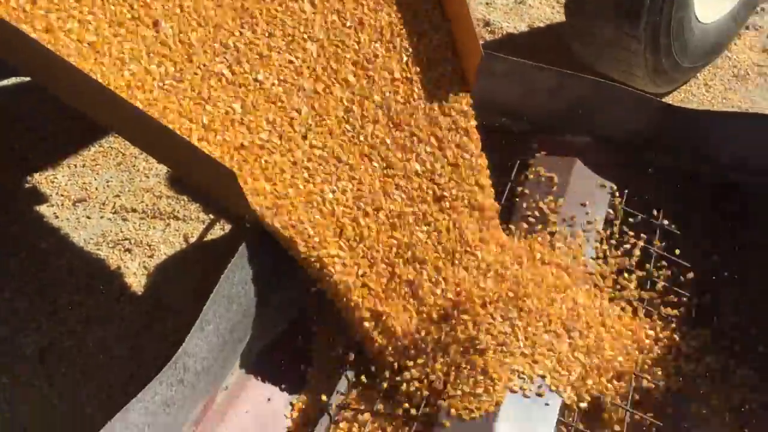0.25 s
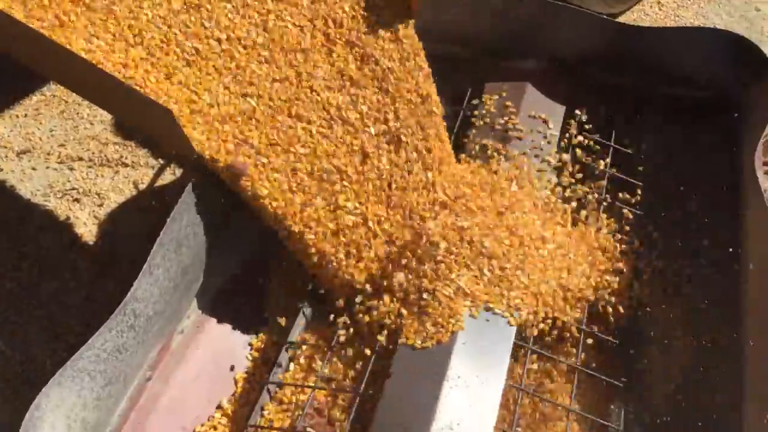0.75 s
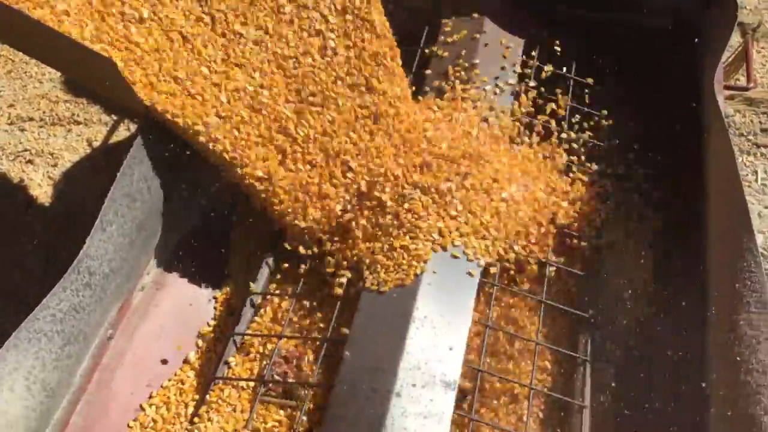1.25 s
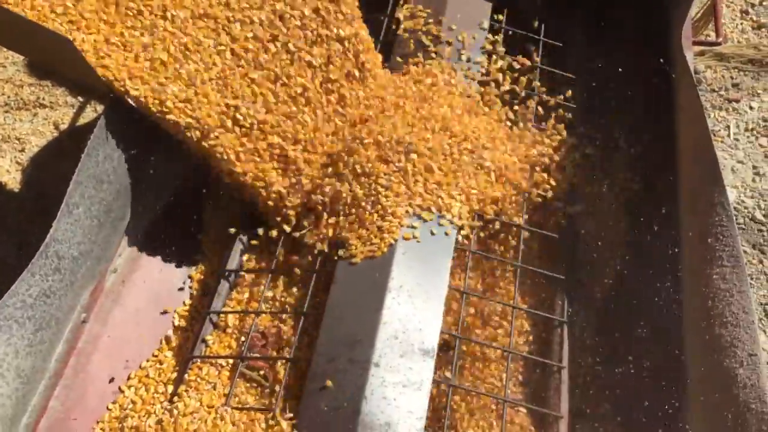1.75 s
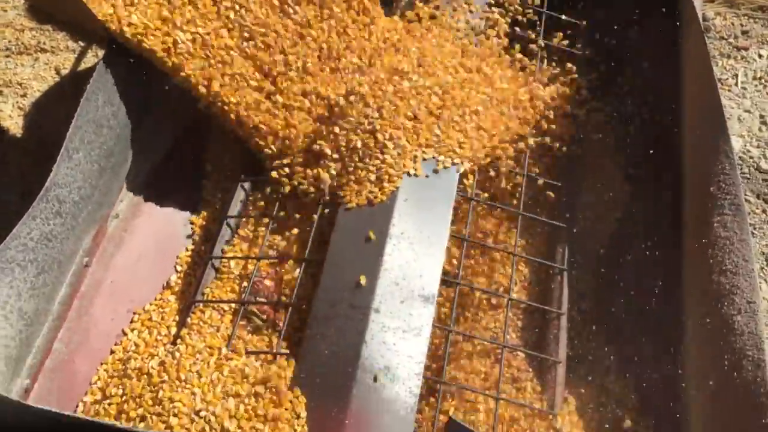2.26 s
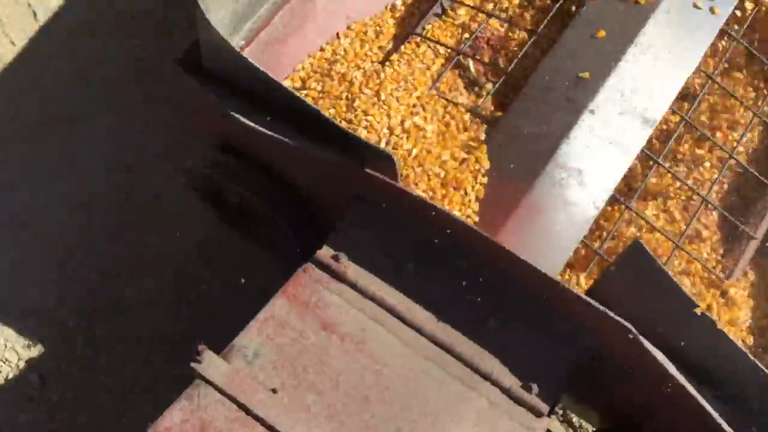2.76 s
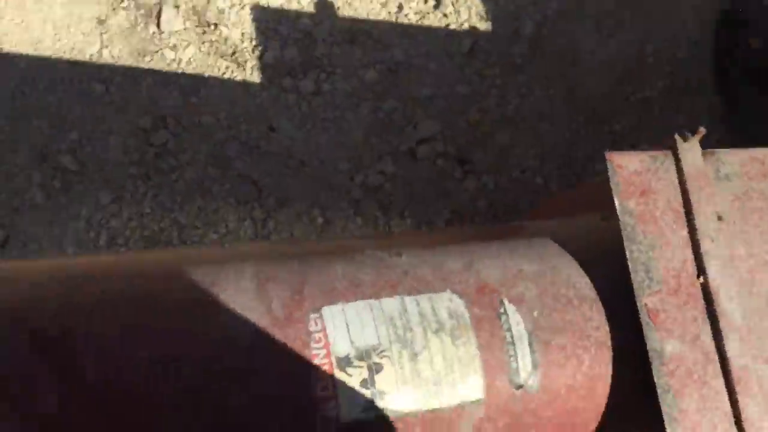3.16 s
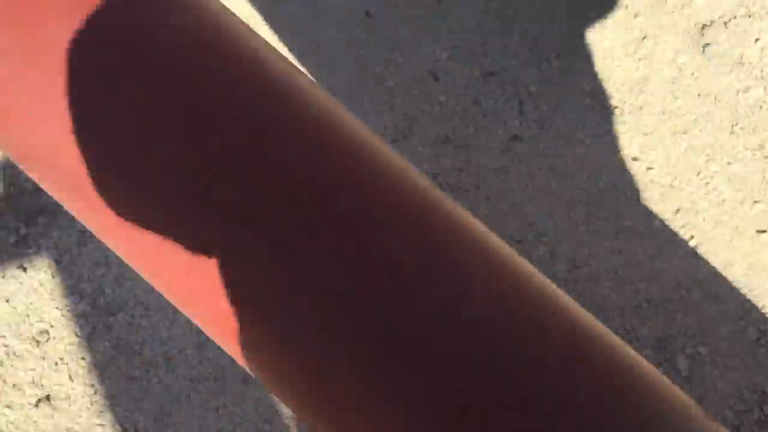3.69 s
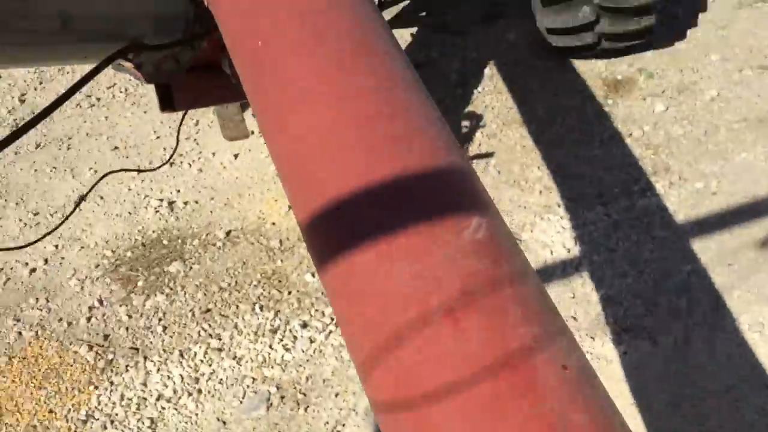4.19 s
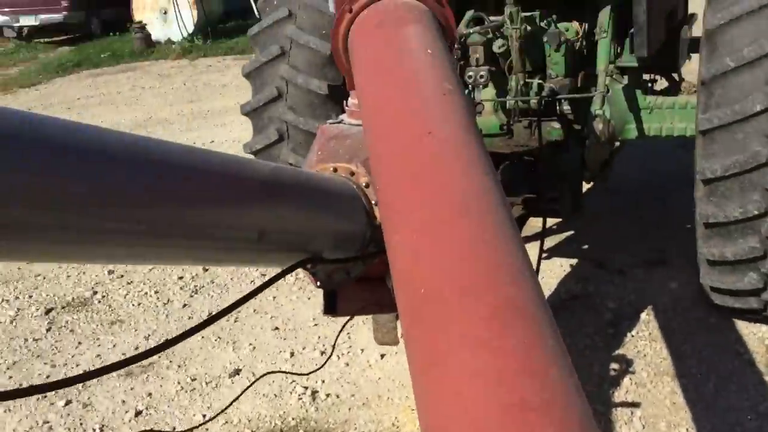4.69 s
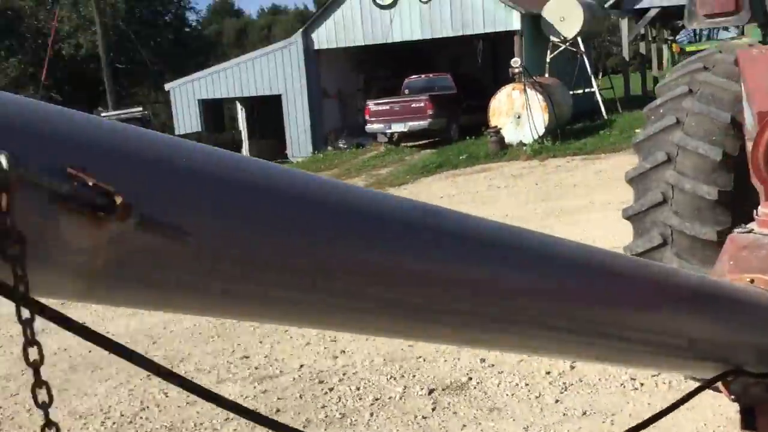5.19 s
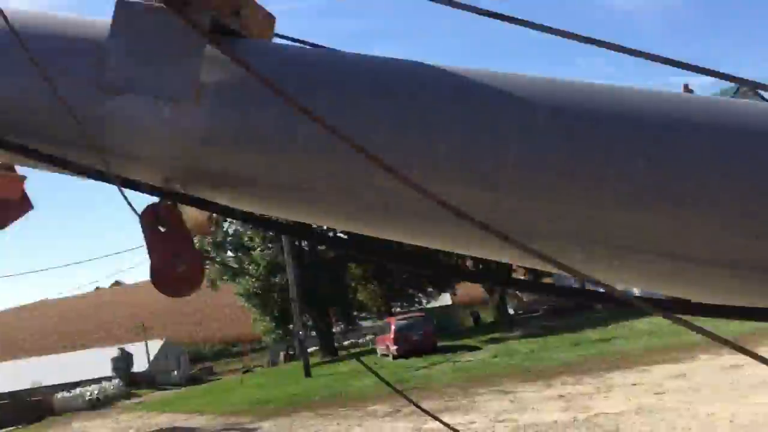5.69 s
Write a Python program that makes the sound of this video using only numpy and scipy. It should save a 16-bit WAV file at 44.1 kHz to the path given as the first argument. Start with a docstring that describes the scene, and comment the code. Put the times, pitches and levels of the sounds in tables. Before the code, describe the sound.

Outdoors on a farm, countless kernels tap on a metal hopper close to the microphone, merging into a continuous hiss over the gear hum and low rumble of a running auger. After about three seconds the listener moves toward an idling diesel tractor, so its knocking and rapid raspy chirp grow clearer while the pouring carries on, slightly softer and duller. Faint wind gusts sit underneath.

```python
"""A dense hiss of kernel taps: shelled grain pours from a chute onto an auger hopper's guard and grate.
The auger's gears hum, grain rumbles through its tube, and a diesel tractor idles beyond it with a knock
and a raspy chirp. The listener turns from the hopper along the tube, so the hiss dulls and the tractor
comes forward. Light wind; one microphone whose overload squeezes the highest peaks."""
import sys
import numpy as np
from scipy import signal
from scipy.fft import rfft, irfft
from scipy.io import wavfile
from scipy.ndimage import uniform_filter1d

SR = 44100
rng = np.random.default_rng(int(sys.argv[2]) if len(sys.argv) > 2 else 0)


def dump_mix(stems):
    """Bounce the given channels to the path in sys.argv[1] as a 16-bit WAV at rate SR."""
    frames = np.atleast_2d(stems).T  # one column per channel
    limited = np.clip(frames, -1, 1)  # hard clip at full scale
    pcm = np.round(limited * 32767).astype(np.int16)
    wavfile.write(sys.argv[1], SR, pcm)


N = 261954
T = np.arange(N) / SR
CRANK_HZ = 11.72


def gain_of(db):
    """Decibels to gain."""
    return 10 ** (np.asarray(db) / 20)


def unit_rms(x):
    """Scale to rms 1."""
    return x / np.sqrt(np.mean(x ** 2) + 1e-20)


def bell(x, centre, width):
    """Bell curve of height 1, down to 1/e at centre +/- width."""
    return np.exp(-((x - centre) / width) ** 2)


def spectrum_db(points, hz):
    """Interpolate a spectrum table over log frequency."""
    points_hz, db = np.transpose(points)
    return np.interp(np.log(hz + 1), np.log(points_hz + 1), db)


def curves(rows, t):
    """Interpolate each column of a time table at times t."""
    times_s, *columns = np.transpose(rows)
    return [np.interp(t, times_s, column) for column in columns]


def step_db(before_db, after_db, span_s=(2.8, 3.66)):
    """Level glide as the listener steps from the hopper towards the tractor."""
    return np.interp(T, span_s, [before_db, after_db])


def drift(fastest_hz, count=24):
    """Slow random curve, rms 1."""
    t = T[::256]
    hz = np.geomspace(fastest_hz / 10, fastest_hz, count)[:, None]
    sines = np.sin(2 * np.pi * (hz * t + rng.random((count, 1)))) / np.sqrt(hz)
    return np.interp(T, t, unit_rms(sines.sum(axis=0)))


def patches(shape, bins, frames):
    """Smooth random field over frequency and time, rms 1."""
    field = rng.standard_normal(shape[::-1]).T
    return unit_rms(uniform_filter1d(uniform_filter1d(field, bins, axis=0), frames, axis=1))


def filtered_noise(order, edges_hz, kind, gate=1):
    """Gated white noise through a Butterworth filter, rms 1."""
    sos = signal.butter(order, edges_hz, kind, fs=SR, output="sos")
    return unit_rms(signal.sosfilt(sos, gate * rng.standard_normal(N)))


def tone(hz, waver_db, wander_cycles):
    """Machine tone of wavering level and phase, rms about 1."""
    cycles = hz * T + rng.random() + wander_cycles * drift(1.502)
    return np.sqrt(2) * gain_of(waver_db * drift(6.0)) * np.sin(2 * np.pi * cycles)


def wind(gust_db=2.2):
    """Light gusts at the microphone: deep bass noise."""
    # (time [s], level [dB])
    strength = [(0, -39), (.55, -45), (1.3, -42), (2.1, -40), (2.6, -46), (3.15, -39.5), (3.9, -49),
                (5.1, -53), (5.94, -60)]
    level_db = curves(strength, T)[0] + gust_db * drift(8.1)
    hz = np.fft.rfftfreq(N, 1 / SR)
    colour = (hz > 18) * (hz / 50) ** 0.5 / (1 + (hz / 105) ** 4)
    return gain_of(level_db) * unit_rms(irfft(rfft(rng.standard_normal(N)) * colour, N))


def tractor(knock_db=-36.0, knock_decay_cycles=0.67):
    """Idling diesel: tones at crank multiples, six knocks a turn, low exhaust."""
    # engine tones: (crank multiple), (relative level [dB])
    orders = np.array([6, 9, 15, 18, 21, 24, 30, 36, 48, 84])
    orders_db = [-58, -55, -40, -34.5, -46, -42, -38.5, -43.5, -43, -48]
    tones = sum(gain_of(db) * tone(order * CRANK_HZ, waver_db=1.5, wander_cycles=0.2)
                for order, db in zip(orders, orders_db))
    knock_phase = (6 * CRANK_HZ * T - 0.1) % 1
    knock = filtered_noise(2, [1000, 1450], "band", gate=np.exp(-knock_phase / knock_decay_cycles))
    engine = tones + gain_of(knock_db) * knock
    exhaust = filtered_noise(4, [114, 170], "band")
    exhaust += gain_of(-2.5) * tone(12 * CRANK_HZ, waver_db=-0.5, wander_cycles=0.17)
    return gain_of(step_db(0.5, 3)) * engine + gain_of(step_db(-43, -35.5)) * exhaust


def tractor_chirp(rise_s=0.01, rasp_depth=0.18):
    """A tractor part rings once a crank turn, with a soft onset and a rasp."""
    # (frequency [Hz], relative level [dB], t60 [s])
    modes = [(1234, 1, 0.2), (1195, 0, .12), (1216, -7, 0.2), (1360, -6, 0.21), (1310, -11, 0.065),
             (1092, -8, 0.17)]
    # (time [s], level [dB])
    loudness = [(0, -42), (3.2, -36), (3.45, -30), (3.8, -32), (4.15, -27.5), (4.5, -28.5), (4.95, -31),
                (5.5, -50), (5.94, -52)]
    age_s = (CRANK_HZ * T - 0.19) % 1 / CRANK_HZ
    ring = sum(gain_of(db - 60 * age_s / t60_s) * np.sin(2 * np.pi * hz * age_s)
               for hz, db, t60_s in modes)
    onset = (1 - np.exp(-age_s / rise_s)) ** 2
    rasp = 1 + rasp_depth * filtered_noise(2, 60, "low")
    return gain_of(curves(loudness, T)[0]) * unit_rms(onset * ring * rasp)


def tube_rumble(swell_db=4.5, swell_at_s=3.44, swell_width_s=0.42):
    """Low noise of grain dragged through the tube; swells where the tube passes close."""
    # hopper, tube and drive: (frequency [Hz], relative density [dB])
    spectrum = [(35, -59), (70, -40), (124, -23), (159, -7), (199, -0.5), (226, -1.5), (265, -2), (340, -5),
                (477, -16.5), (559, -27), (900, -29), (1170, -49), (1980, -120)]
    colour = gain_of(spectrum_db(spectrum, np.fft.rfftfreq(N, 1 / SR)))
    level_db = step_db(-22.5, -24) + swell_db * bell(T, swell_at_s, swell_width_s)
    return gain_of(level_db) * unit_rms(irfft(rfft(rng.standard_normal(N)) * colour, N))


def auger_drive(main_hz=185.95, second_hz=218.45, shaft_hz=11.5, beat_s=0.578, first_dip_s=0.41):
    """Two gear hums: the main one beats with a neighbour tone, the second has shaft sidebands."""
    # (time [s], main hum [dB], second hum [dB])
    levels = [(0, -27.5, -31), (1.5, -23.5, -28.5), (2.5, -23.5, -27), (3.1, -18.5, -31),
              (4.2, -19.5, -25.5), (5.05, -19, -24), (5.5, -25, -23), (5.94, -31, -29.5)]
    # sidebands: (offset [shaft multiples]), (level re second hum [dB])
    side_orders = (-1, 1, 9.5)
    sides_db = (-10, -10, -14.5)
    main_db, second_db = curves(levels, T)
    cycles = main_hz * T + 0.051 * drift(1.22)
    main = gain_of(main_db) * np.sin(2 * np.pi * cycles)
    neighbour = -gain_of(-32) * np.sin(2 * np.pi * (cycles + (T - first_dip_s) / beat_s))
    second = tone(second_hz, waver_db=1.5, wander_cycles=0.088)
    for order, db in zip(side_orders, sides_db):
        second += gain_of(db) * tone(second_hz + order * shaft_hz, waver_db=2.0, wander_cycles=0.057)
    return np.sqrt(2) * (main + neighbour) + gain_of(second_db) * second


def tap_colour(hz, t, away):
    """Tap spectrum shaped by the hopper steel and the listener's turn; rms 1 per frame."""
    # facing the hopper, and turned away: (frequency [Hz], relative density [dB])
    facing_spectrum = [(290, -49), (500, -13.5), (900, -10.5), (1250, -6), (1900, -3), (2300, -9.5),
                       (3500, -3.5), (5500, -4), (7600, -5), (9000, -6), (9800, -11.5), (11500, -9),
                       (14000, -15), (15800, -17)]
    away_spectrum = [(290, -19), (500, -6), (680, -4), (850, -11.5), (1250, -6.5), (1750, -10.5),
                     (2600, -5.5), (4400, -5.5), (5600, -1.5), (7500, -3.5), (8500, -4.5), (9800, -12),
                     (10700, -14), (15800, -15.5)]
    # passing humps and dips as the listener moves:
    # (time [s], width [s], centre [Hz], slide [Hz/s], bend [Hz/s^2], width [Hz], lift [dB])
    humps = [(0.02, 0.41, 3900, 0, 0, 870, 2.5), (3.17, 0.47, 2980, 800, 2002, 630, 5.5),
             (3.23, .5, 5000, 1904, -500, 450, 2.5), (3.5, .4, 1770, 500, 0, 280, -1.5),
             (2.9, .25, 14000, 0, 0, 3200, 2.5), (2.93, 0.18, 7100, 0, 0, 490, -3),
             (3.27, 0.39, 7150, -900, 0, 550, 4), (4.66, .6, 6400, 0, 0, 450, 1),
             (3.14, .35, 9840, -1200, 0, 700, 4.5), (3.76, .22, 9300, 0, 0, 760, -3),
             (3.42, .2, 14400, 0, 0, 3200, -2.5), (4.9, 0.72, 11000, 0, 0, 4400, 1.9)]
    # (centre [Hz], width [Hz], lift facing [dB], lift away [dB])
    steel_modes = [(1980, 150, -1, -0.6), (2610, 160, 1.5, 0), (3730, 200, 2.5, 0.5), (4200, 270, 2, -1),
                   (4870, 250, 2, -1.5), (6360, 390, 3.5, 0.5), (6960, 380, 2.5, 2), (8260, 320, 4, -1),
                   (10800, 500, 3.5, -0.5), (13000, 300, 1.5, -3)]
    colour_db = (1 - away) * spectrum_db(facing_spectrum, hz) + away * spectrum_db(away_spectrum, hz)
    for at_s, width_s, centre_hz, slide, bend, width_hz, lift_db in humps:
        path_hz = centre_hz + slide * (t - at_s) + bend * (t - at_s) ** 2
        colour_db += lift_db * bell(t, at_s, width_s) * bell(hz, path_hz, width_hz)
    for centre_hz, width_hz, facing_db, away_db in steel_modes:
        colour_db += ((1 - away) * facing_db + away * away_db) * bell(hz, centre_hz, width_hz)
    colour = gain_of(colour_db)
    return colour / np.sqrt((colour ** 2).mean(axis=0))


def grain_pour(spread_db=0.5, clump_db=-0.23, ring_db=1.5, flicker_db=0.48):
    """Kernel taps merge into hiss; the stream clumps, steel modes ring up, the treble flickers."""
    # listener's turn: (time [s], hiss level [dB], share turned away [0-1])
    turn = [(0, -9.5, 0.4), (1.5, -9.5, 0.28), (2.5, -9.5, 0.08), (2.9, -9, 0.67), (3.4, -10, 0.4),
            (4.1, -11.5, 0.7), (5, -11.5, 0.9), (5.94, -12, 0.7)]
    tap_size = gain_of(spread_db * np.minimum(rng.exponential(1, N), 4))
    hz, t, taps = signal.stft(tap_size * rng.standard_normal(N), SR, nperseg=1024, noverlap=768)
    hz = hz[:, None]
    clumps = patches(taps.shape, bins=14, frames=14)
    rings = patches(taps.shape, bins=2, frames=10)
    flicker = unit_rms(uniform_filter1d(rng.standard_normal(len(t)), size=5))
    treble = np.clip(hz / 8000, 0, 1)
    taps *= tap_colour(hz, t, away=curves(turn, t)[1])
    taps *= gain_of(clump_db * clumps + ring_db * rings + flicker_db * flicker * treble)
    _, hiss = signal.istft(taps, SR, nperseg=1024, noverlap=768)
    return gain_of(curves(turn, T)[0]) * unit_rms(hiss[:N])


def scene():
    """All sources at one microphone, on two equal channels."""
    mono = grain_pour() + wind() + tube_rumble() + auger_drive() + tractor() + tractor_chirp()
    return np.array([mono, mono])


def record(dry, knee=0.6, ceiling=1.03, cutoff_hz=15770):
    """Microphone overload: soft clip above the knee, then a steep low-pass."""
    headroom = ceiling - knee
    excess = np.maximum(abs(dry) - knee, 0)
    clipped = np.sign(dry) * (np.minimum(abs(dry), knee) + headroom * np.tanh(excess / headroom))
    lowpass = signal.firwin(1535, cutoff_hz, window=("kaiser", 9), fs=SR)
    return signal.oaconvolve(clipped, lowpass[None], "same")


dry = scene()
out = record(dry)
dump_mix(out)
```